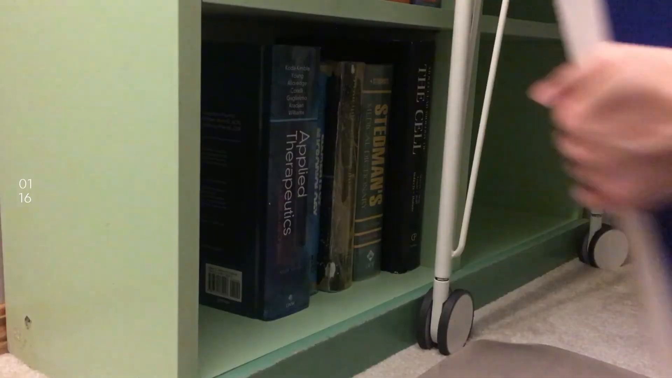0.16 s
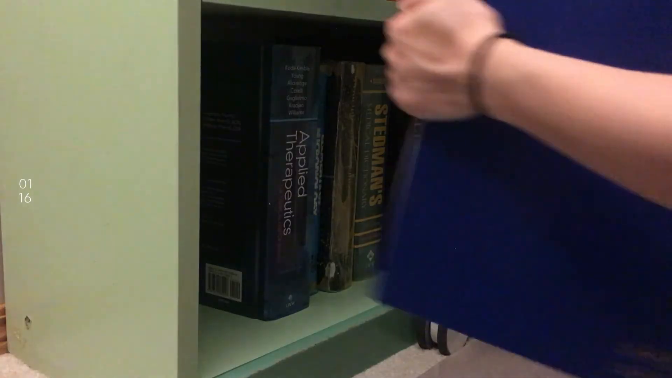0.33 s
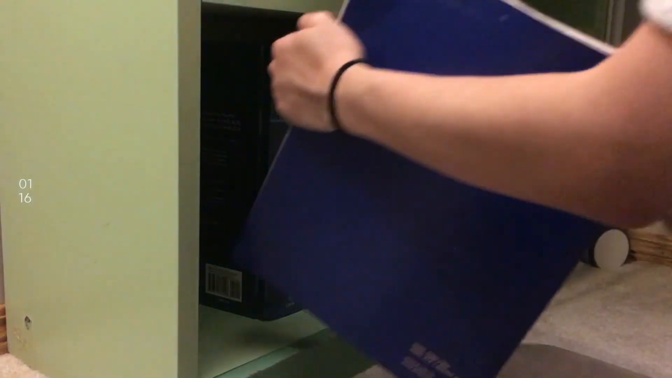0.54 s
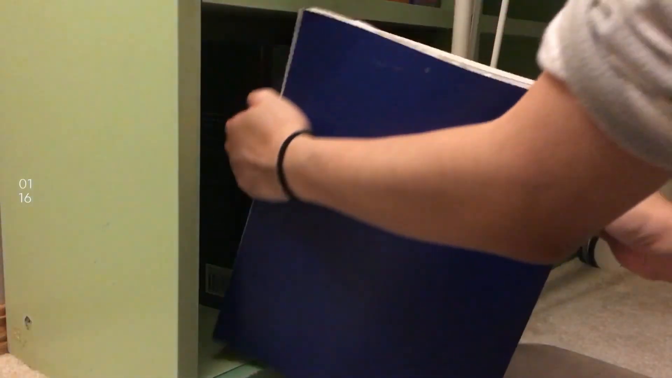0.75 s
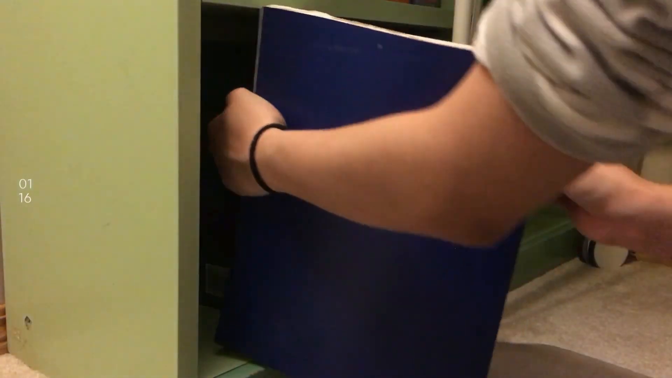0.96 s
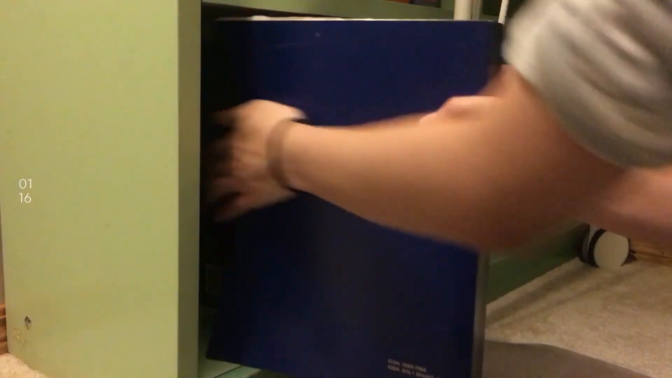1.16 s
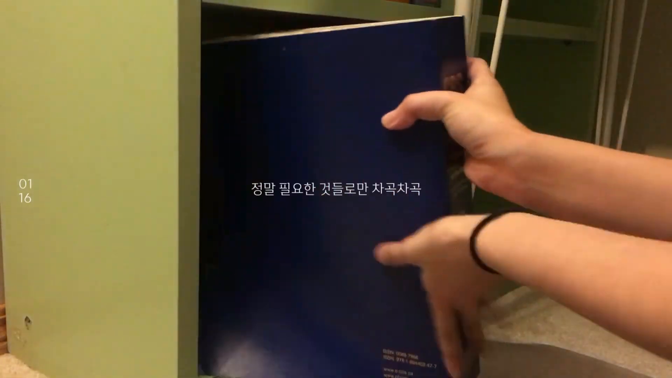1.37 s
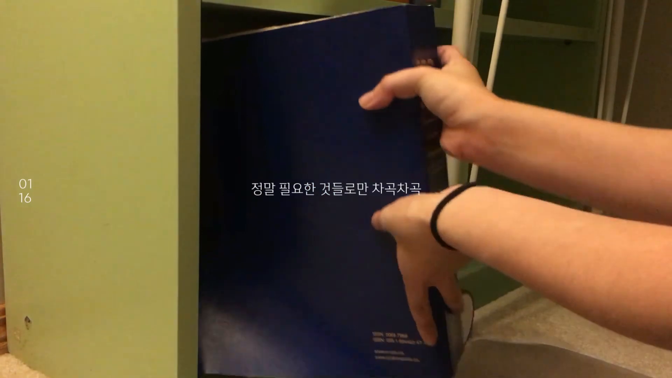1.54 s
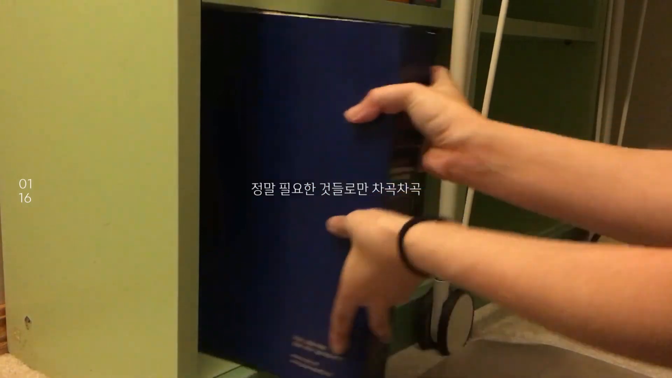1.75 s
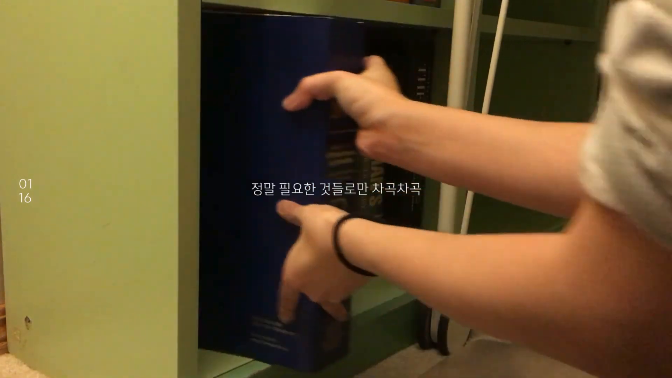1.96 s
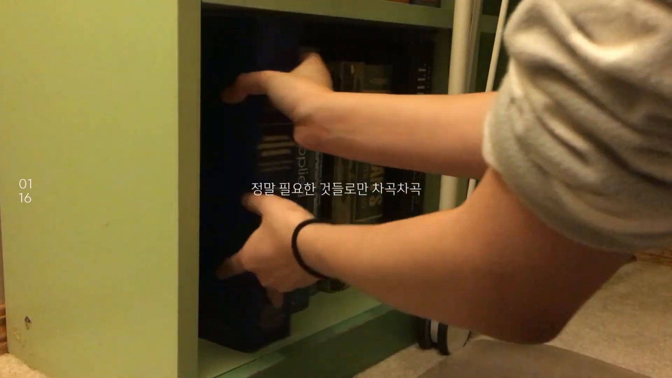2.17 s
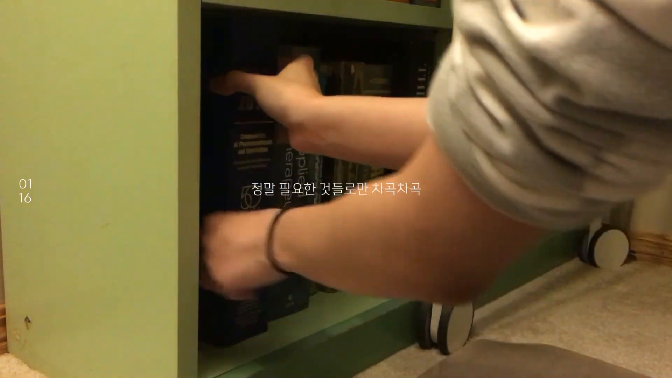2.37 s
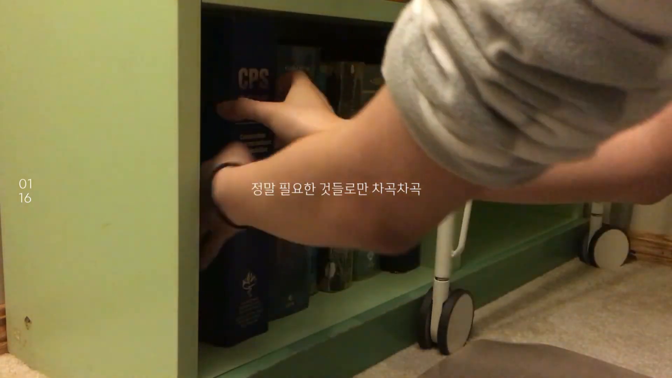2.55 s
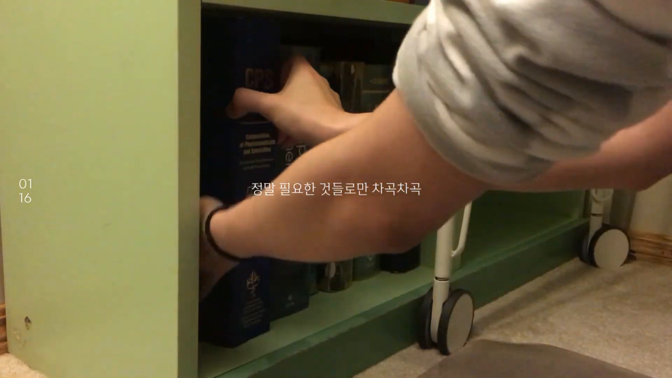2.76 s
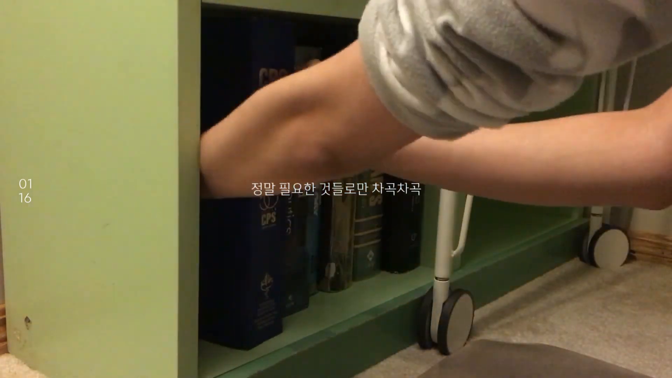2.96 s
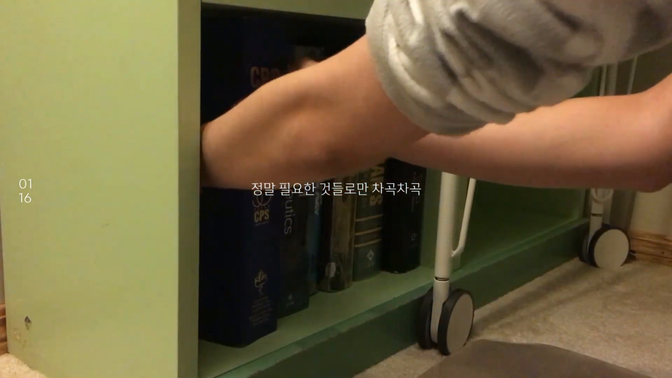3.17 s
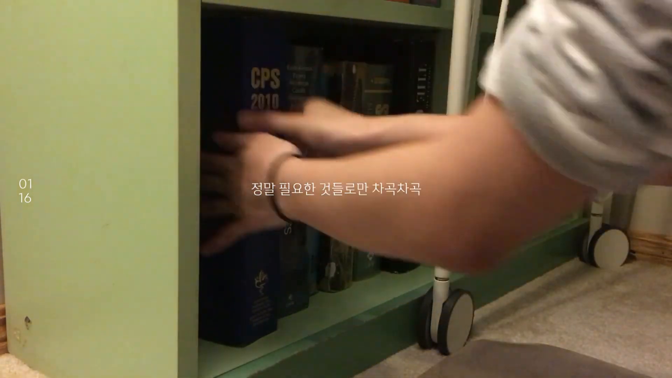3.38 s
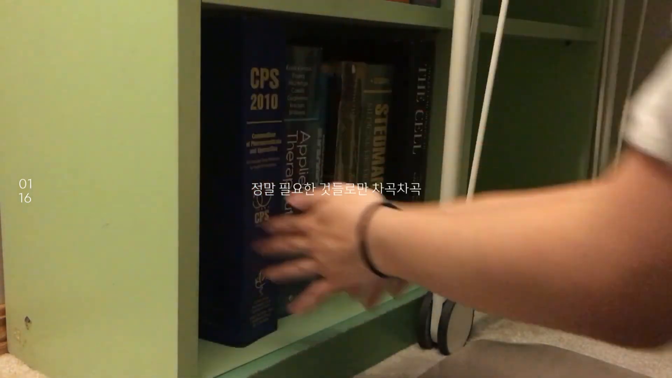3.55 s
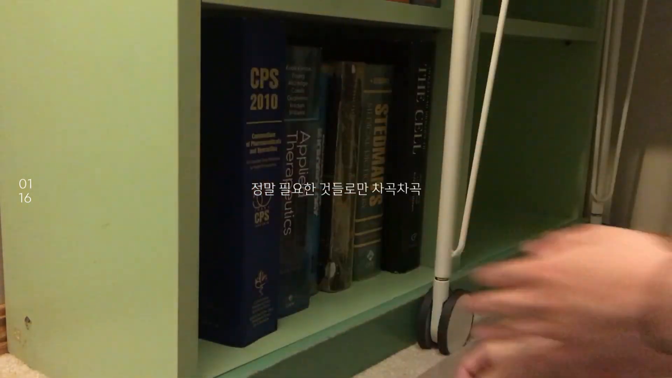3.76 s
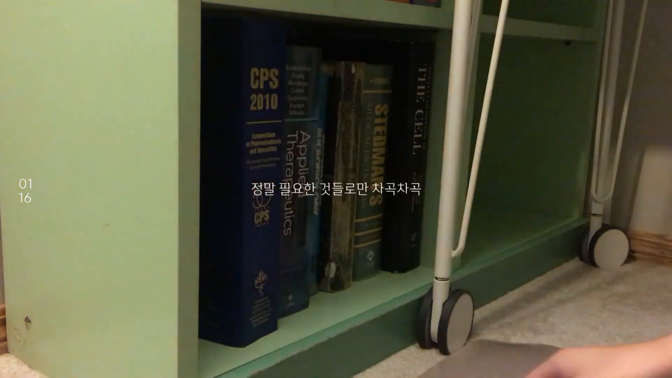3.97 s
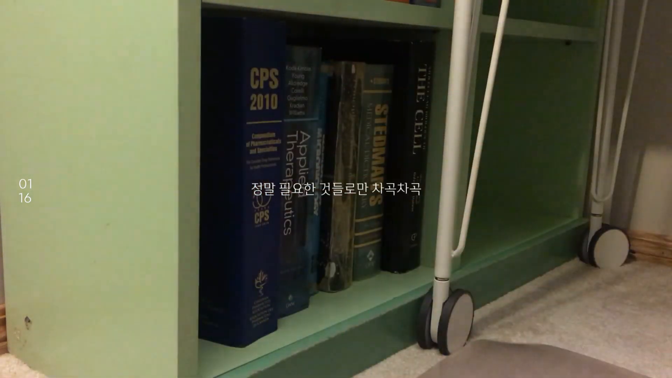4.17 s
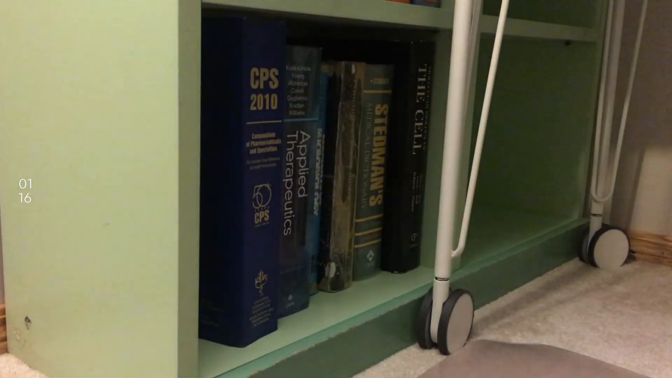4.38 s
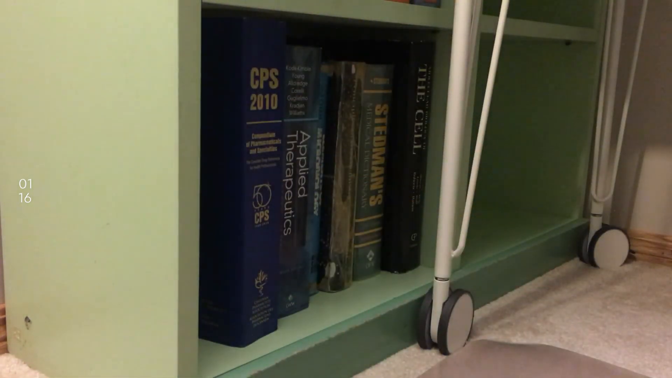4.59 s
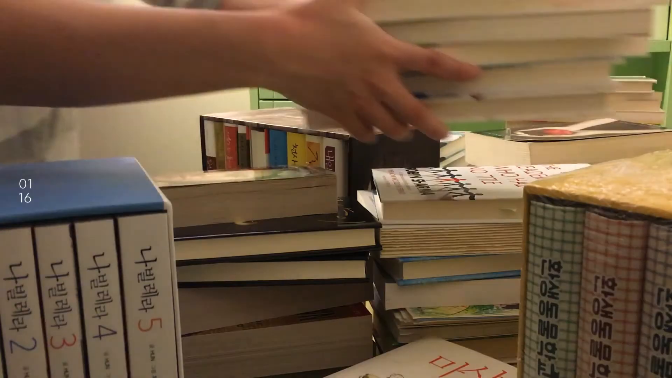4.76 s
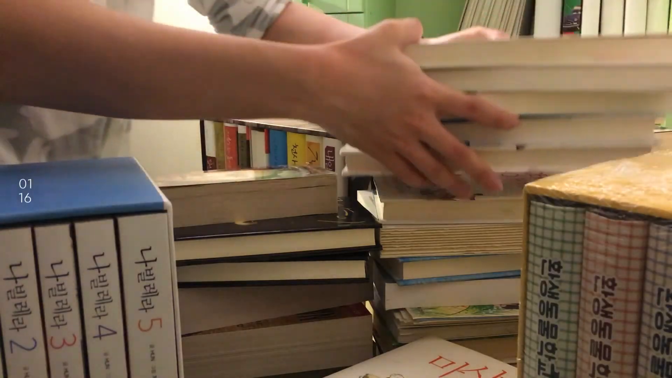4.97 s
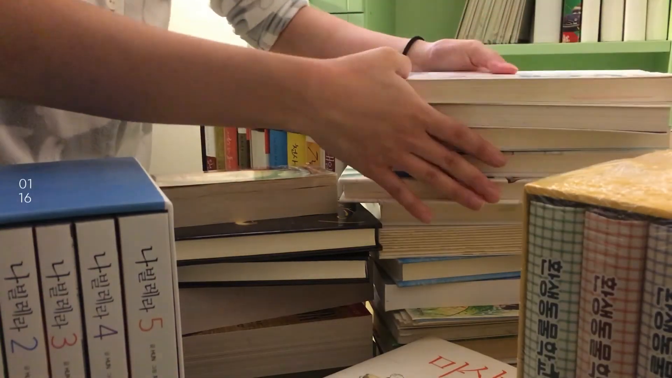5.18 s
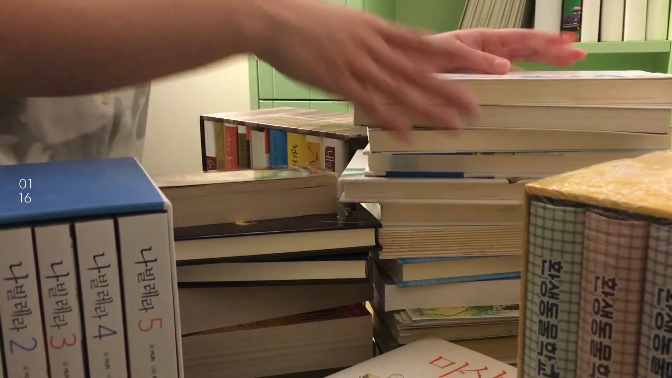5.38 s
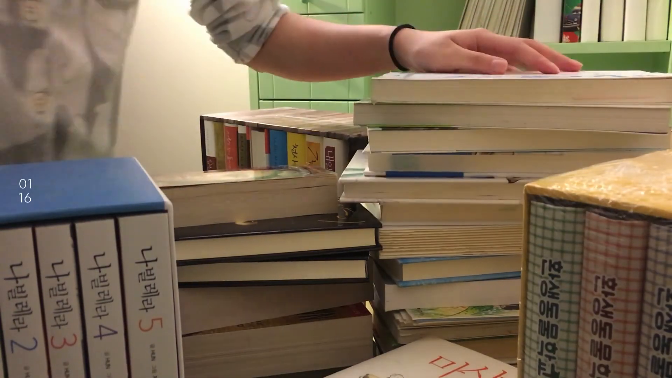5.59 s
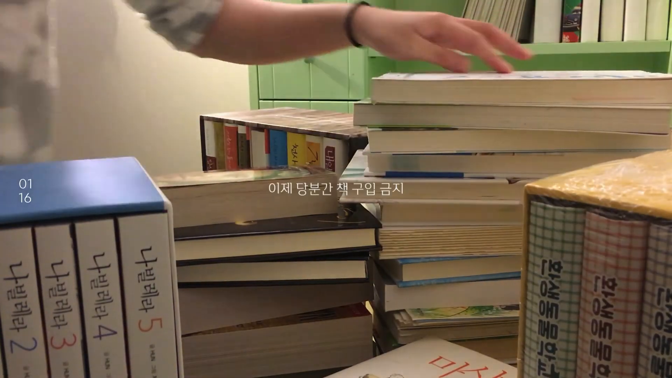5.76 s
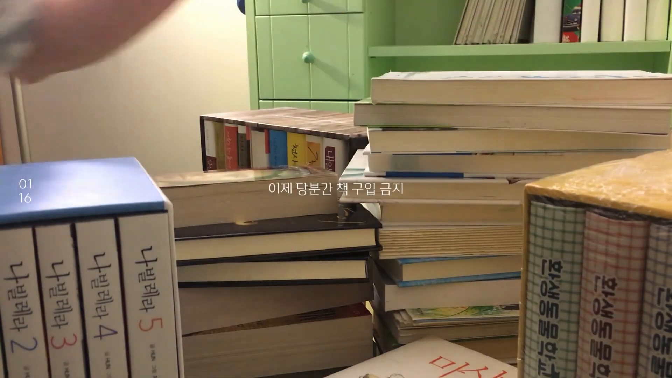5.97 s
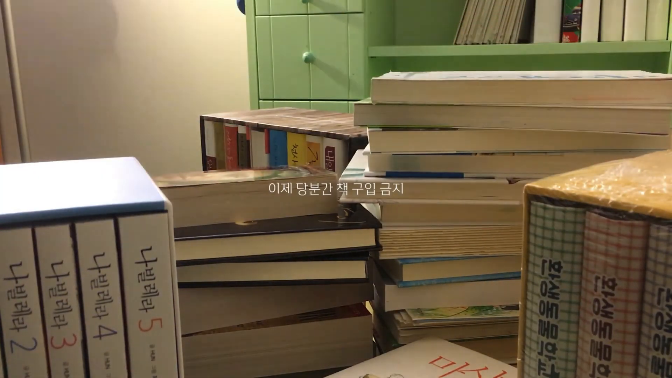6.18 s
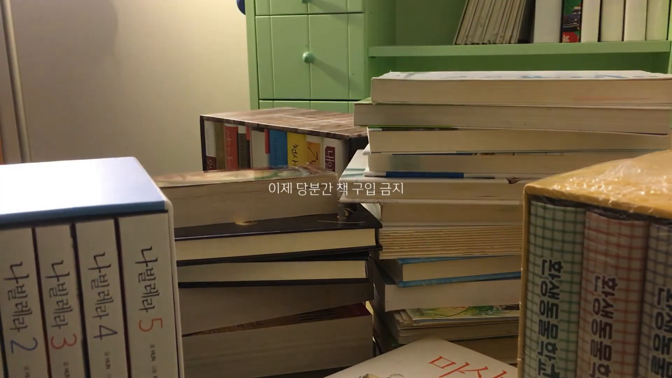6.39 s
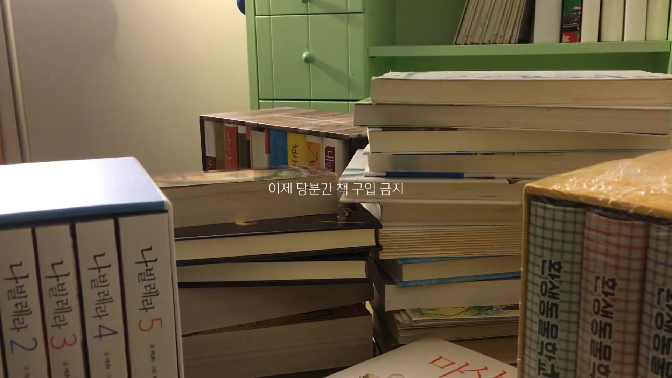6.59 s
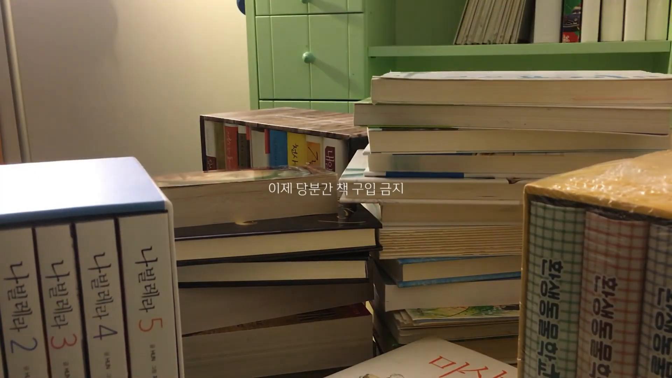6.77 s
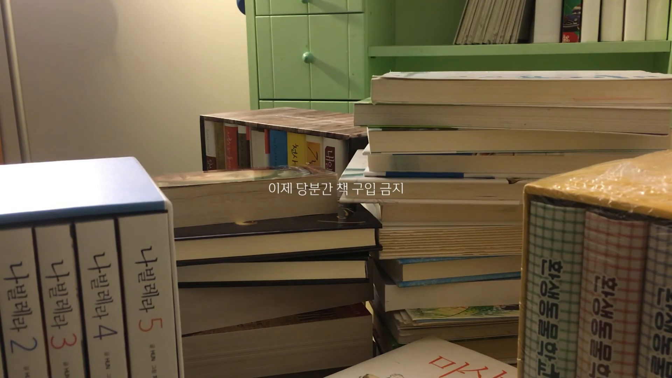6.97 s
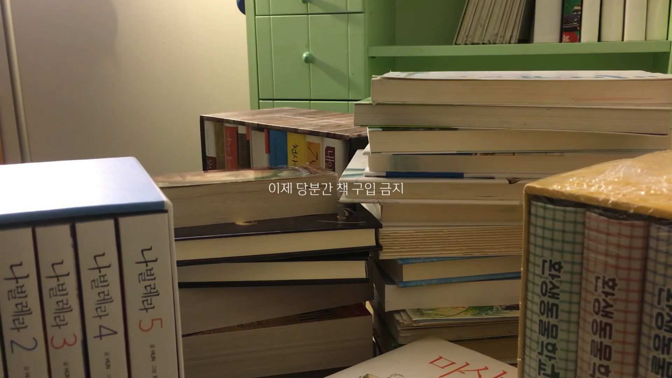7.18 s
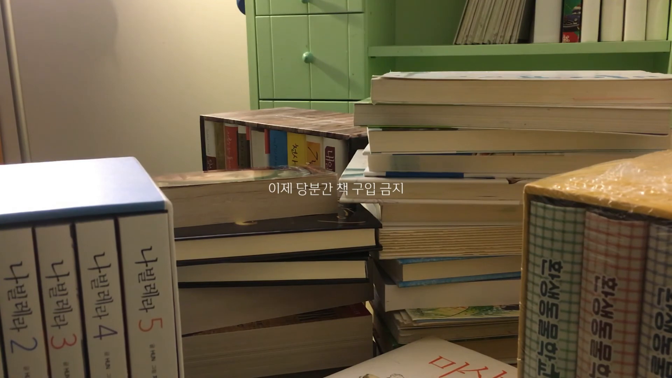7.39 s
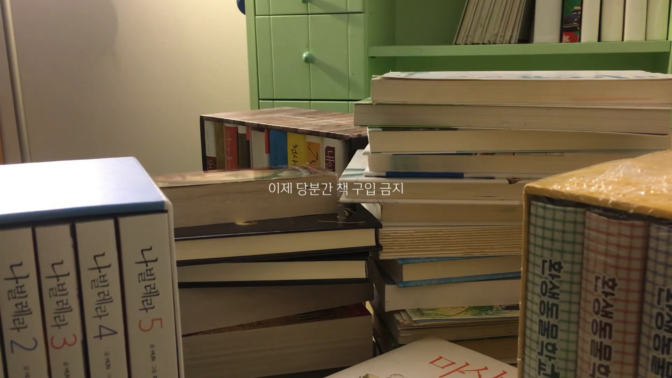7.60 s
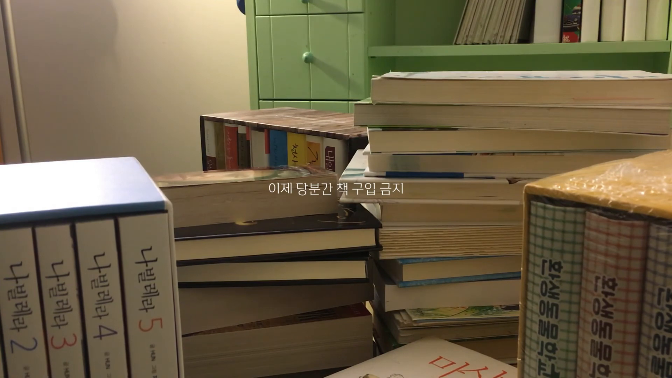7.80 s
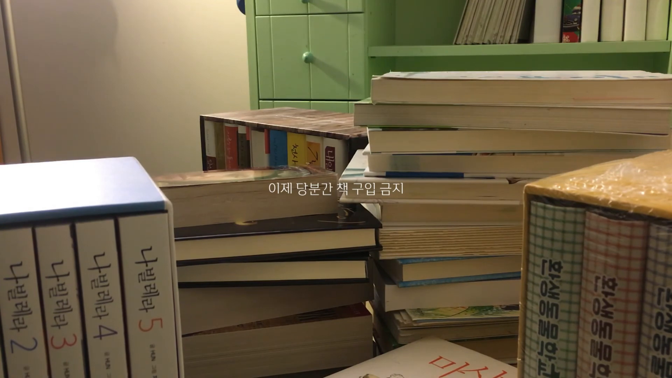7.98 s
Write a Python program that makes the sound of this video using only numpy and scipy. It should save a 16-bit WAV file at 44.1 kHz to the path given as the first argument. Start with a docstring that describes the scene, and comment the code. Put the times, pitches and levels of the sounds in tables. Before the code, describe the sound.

Close, dry indoor handling of books: light bumps, one strong woody knock, then rough sliding of a big cover between neighbours, ending in several firm thuds. Cloth rustles and muffled floor thumps come next. A momentary silence, then paperbacks land heavily on a paper pile, loud and short. The rest is quiet, with small ticks, a few dull bumps and a faint low hum.

```python
"""A quiet room with a wooden shelf: a heavy book is knocked onto it, slid home between its neighbours and
pressed flush; someone shifts on the floor. After a silent gap paperbacks land on a stack.
Contacts are short thuds, clusters of decaying modes and noise slaps; ticks and a squeak are single tones.
Sliding covers, sleeves and rumble are shaped noise under one pressure curve, over steady room tone."""
import sys
import numpy as np
from scipy import signal
from scipy.fft import rfft, irfft, next_fast_len
from scipy.io import wavfile
from scipy.ndimage import uniform_filter1d, map_coordinates

SR = 44100
rng = np.random.default_rng(int(sys.argv[2]) if len(sys.argv) > 2 else 0)


def persist_wave(psi):
    """Save psi, clipped to +-1, as 16-bit WAV."""
    counts = np.round(np.clip(psi, -1, 1) * 32767).astype(np.int16)
    wavfile.write(sys.argv[1], SR, np.atleast_2d(counts).T)


def boost_factor(decibels):
    """Convert a level in decibels to a linear amplitude factor."""
    exponent = np.asarray(decibels, float) / 20
    return 10 ** exponent


N = 354468

# Room tone spectrum: f/Hz, relative level/dB
TONE_SPECTRUM = [(12, -24), (20, 1.5), (63, 4.5), (123, -19), (187, -29.5), (388, -21.5), (542, -6),
                 (802, -16), (1000, -20), (2460, -27.5), (4180, -18), (4810, -33), (9140, -23.5),
                 (14300, -24), (16000, -33.5)]
TONE_RMS_DB = -62
# Steady backdrop, stepping to a new level: from t/s, low hum level/dB, soft rustle level/dB
BACKDROP = [(0, -54, -58.5), (2.4, -57.5, -72.5), (2.729, -61, -59.5), (3.578, -69.5, -67),
            (3.979, -59, -63), (4.77, -54, -64.5)]
# Sleeves and hands brushing past: middle t/s, length/s, level/dB, treble share/dB
STROKES = [(0.335, 0.24, -53.5, -2), (0.72, 1, -61.5, -6), (1.087, 0.3, -55.5, -4),
           (2.894, 0.31, -53.5, -1.5), (3.137, 0.24, -52, -4.5), (3.39, 0.41, -56.5, 0.5),
           (4.24, 0.77, -59, -4.5), (4.354, .1, -50, -7.5), (4.617, 0.38, -57.5, -3),
           (4.931, 0.06, -56, -4), (5.039, 0.11, -53, -2), (5.133, 0.27, -55, -2.5),
           (5.814, 0.33, -63, 1.5), (6.148, 0.26, -65, -3), (6.5, 0.2, -64.5, -1),
           (6.92, 0.32, -61.5, -4.5)]
# Heavy book sliding home: t/s, pressure level/dB, speed as treble share/dB
SLIDE = [(1.145, -47, -6.5), (1.163, -49, -6.5), (1.209, -24, -1), (1.241, -36, -5), (1.415, -30.5, -7),
         (1.421, -32, -4), (1.441, -30, -6.5), (1.515, -43.5, -3), (1.555, -46.5, -5), (1.603, -31.5, 0),
         (1.639, -31, -3), (1.663, -41, -1), (1.725, -41, -1), (1.769, -54, -4), (1.805, -26, -1),
         (1.897, -43.5, 0), (2.015, -44, -2.5), (2.031, -38.5, 1.5), (2.077, -42.5, -1.5),
         (2.315, -35.5, -0.5)]
SLIDE_RELEASE_S, SLIDE_RELEASE_DB = 0.2, -37.5  # the slide dies away against the back wall
USUAL_SHARE_DB = -3
# Short hard scuffs, cover on cover: t/s, level/dB before layer offsets, rise/s, fall/s
SCUFFS = [(1.13, -34.5, 0.0026, 0.0075), (1.183, -42, 0.0051, .02), (1.211, -26.5, 0.0057, 0.0072),
          (1.23, -46, 0.0017, 0.0041), (1.811, -37, 0.015, 0.012), (2.033, -55, .006, .008),
          (1.637, -49.5, .02, 0.018), (5.0715, -23.5, 0.003, 0.002), (6.877, -70, 0.017, 0.019)]
# Spectra of the rubbing layers: f/Hz, relative level/dB
RASP_SPECTRUM = [(260, -48), (450, -9), (688, -9), (830, -0.5), (900, -1.5), (2000, -4.5), (2600, -27),
                 (4400, -120)]
SCRATCH_SPECTRUM = [(1000, -29), (1700, -19), (2170, -6.5), (2320, 1), (2860, 1.5), (4800, -5.5),
                    (6240, -41.5), (10600, -120)]
HISS_SPECTRUM = [(2350, -27), (4000, -5), (4900, -1), (5670, -1), (11600, -6.5), (14900, -13),
                 (16000, -22.5)]
RUMBLE_SPECTRUM = [(15, -37), (25, -2), (70, 1.5), (113, -4.5), (149, 1), (243, -4.5), (369, -7.5),
                   (545, -19), (626, -18), (700, -24), (910, -55.5), (1540, -120)]
RATTLE_SPECTRUM = [(250, -38), (450, -6.5), (800, -2), (1200, -4), (1700, -9.5), (2400, -41.5),
                   (4000, -120)]
RASP_DB, SCRATCH_DB, HISS_DB, RUMBLE_DB = -3.5, -4.5, -3, -10  # layer offsets to the pressure
RUMBLE_DB_PER_DB, SCRATCH_DB_PER_DB = 0.92, 0.038  # rumble slope; extra scratch about -40 dB
SHAKE_DB, SHAKE_T60_S = -30, 0.17  # boards rumble on after each contact
RATTLE_DB, RATTLE_T60_S = -11.5, 0.072  # neighbouring books rasp after an edge knock
# Contacts with the shelf: t/s, contact level/dB, thud f/Hz, edge knock level/dB, flat slap level/dB
# (knock and slap relative to the contact)
KNOCKS = [(0.299, -35.5, 259, 0, -3.5), (0.31, -20, 221, -33, -15.5), (0.357, -22, 271, -13.5, -8),
          (0.4389, -21.5, 234, -21, -26), (0.806, -5.5, 220, -5.5, -18), (0.834, -18, 73, -30.5, -37),
          (0.991, -24.5, 410, -15, -10), (1.049, -31.5, 220, -2, -26), (1.087, -32, 220, -3, -18),
          (1.15, -22, 128, -19, -31), (1.654, -18, 170, -18, -22.5), (1.776, -14, 207, -35.5, -29.5),
          (1.800, -8, 201, -5, -22), (1.803, -2.5, 246.5, -22, -21.5), (1.933, -9.5, 195.4, -8, -34.5),
          (2.0, -32.5, 170.2, -12.5, -36), (2.105, -31.5, 450, -15, -28), (2.142, -23.5, 155, -13, -19),
          (2.307, -20, 195, -16, -29.5), (2.324, -6, 351, -3.5, 0), (2.362, -30.5, 80, -38.5, -36.5),
          (2.455, -10, 310, -5, -42), (2.584, -24, 150, -33, -16), (2.741, -35.5, 273, -21, -13),
          (2.874, -33, 120, -29, -16.5), (2.966, -30.5, 225, -38, -22), (3.187, -21, 166, -14.5, -23),
          (3.227, -32, 80, -39, -36)]
# Soft weight on the floor: columns as KNOCKS
THUMPS = [(3.849, -42.5, 132, -12, -14), (4.102, -28.5, 87, -28, -36), (4.315, -26, 202, -25, -25),
          (4.335, -21, 205, -22, -22), (4.348, -7.5, 205, -19, -21), (4.382, -10, 200, -21, -24),
          (4.418, -40, 188, -28, -35), (4.521, -21.5, 207, -42, -26), (4.534, -16.5, 184, -15, -15),
          (4.721, -33, 120, -8, -24), (5.499, -28.5, 203, -33, -20.5), (6.076, -27.5, 267, -31, -22),
          (6.148, -14, 192, -21.5, -25), (6.184, -24, 185, -24, -35), (6.521, -36, 156, -16, -24.5),
          (6.722, -33, 190, -19, -13.5), (7.431, -35, 164, -18, -27)]
# Paperbacks brush, land on the stack and settle: columns as KNOCKS
LANDING = [(5.005, -40, 237, -22, 0), (5.027, -31.5, 180, -7, -6), (5.07, 4, 184, -12, -17.5),
           (5.092, -2, 177, -16.5, -41), (5.119, -16.5, 150, -20.5, -39)]
# Modes of the shelf boards: f/Hz, relative level/dB, nominal t60/s
SHELF_MODES = [(77.8, -3, 0.43), (149.8, -9, 0.78), (205, -9.5, 0.31), (272.8, -5.5, 0.13),
               (295.4, 0.5, 0.17), (348, -3.5, 0.11), (465, -1, 0.21), (510, -6, 0.14), (628, -2, 0.077),
               (699, -5, 0.18), (792, -0.5, 0.04), (953, -7, 0.057), (1037, -7, 0.16), (1197, -2.5, 0.081),
               (1463, -18, 0.29), (1756, -8, .08), (2110, -20.5, 0.049), (2420, -22.5, .05)]
# Modes of floor and paper stack: f/Hz, relative level/dB, nominal t60/s
STACK_MODES = [(65.4, -3.5, 0.1), (97, -4.5, 0.25), (150, -1.5, 0.22), (175.4, 2, 0.23), (207, -2, 0.039),
               (287, 1.5, 0.068), (409, -3.5, 0.15), (398, 4.5, 0.14), (444, -2.5, 0.035),
               (544, 1.5, 0.066), (700, -12.5, 0.16), (900, -6.5, 0.11), (1091, 11.5, 0.033),
               (1510, -18, 0.058)]
# Drive of the lowest mode, more for a duller, heavier thud: thud f/Hz, level/dB
BOOM = [(85, -4.5), (140, -2.5), (200, -27), (300, -22)]
# Slap spectrum before tilt: f/Hz, relative level/dB
SLAP_SPECTRUM = [(710, -23), (1200, -9), (1720, -14.5), (2110, -9.5), (2830, -19), (3220, -13.5),
                 (6510, -9), (16000, -11)]
EDGE_SOFT_DB, EDGE_HARD_DB, EDGE_SOFT_HZ = -26, 2.5, 550  # a harder edge knocks higher
# Nominal thud t60 for a -23.5 dB contact; stronger contacts last longer (dB of time per dB)
THUD_T60_S, THUD_GROWTH_DB_PER_DB = 0.061, 0.28
THUD_RISE_CYCLES, MODE_SCATTER_DB = 0.35, 2
# Room tail: f/Hz, t60/s
ROOM_T60 = [(100, 0.24), (500, 0.33), (2000, 0.18), (8000, 0.077)]
# Small dry ticks: t/s, ring level/dB, f/Hz, t60/s, click level over ring/dB
TICKS = [(0.807, -15, 1553, .03, -15), (1.129, -40.5, 2520, 0.0044, 5.5), (1.388, -34, 900, 0.008, -2),
         (1.403, -21, 2560, 0.028, -4.5), (1.447, -27, 2050, 0.0082, -7), (2.4545, -19, 978, 0.021, -39),
         (2.599, -54, 1630, 0.02, -5), (2.730, -44, 1274, 0.0089, -6), (3.024, -31, 1720, 0.014, -29),
         (3.399, -49, 1820, 0.096, -9), (4.915, -50, 2550, 0.014, 1), (6.319, -48, 3310, 0.037, -14),
         (6.435, -41, 3760, .03, -26), (6.455, -47, 3570, 0.081, -19), (6.787, -44, 900, .05, -13),
         (6.857, -37, 1060, 0.018, -2.5), (6.948, -50.5, 1940, 0.079, 1)]
# Cover squeaking as it wedges in: t/s, f/Hz, level/dB
SQUEAK = [(1.80, 2980, -51.5), (1.809, 3050, -21), (1.829, 3190, -27.5), (1.848, 3540, -43.5),
          (1.87, 3780, -59.5)]
MIC_LOW_CUT_HZ = 45.4  # the microphone picks up little deep bass from the contacts
# Dips of the microphone housing: centre f/Hz, width/Hz, level/dB
MIC_DIPS = [(4900, 440, -4), (10550, 400, -4)]
# Silences: from t/s, to t/s
GAPS = [(0.134, 0.142), (4.741, 4.770)]


def unit(x):
    """Scales to rms 1."""
    return x / np.sqrt(np.mean(x ** 2) + 1e-20)


def along(points, hz):
    """Interpolates (Hz, value) points on a log frequency axis."""
    f, v = np.transpose(points)
    return np.interp(np.log(hz + 1), np.log(f + 1), v)


def coloured(x, spectrum):
    """Filters x through a (Hz, dB) spectrum, then scales to rms 1."""
    m = next_fast_len(len(x) + 8192)
    gain = boost_factor(along(spectrum, np.fft.rfftfreq(m, 1 / SR)))
    return unit(irfft(rfft(x, m) * gain, m)[:len(x)])


def tilted(spectrum, db_per_octave):
    """Leans the spectrum up or down above 3 kHz."""
    return [(hz, db + db_per_octave * max(np.log2(hz / 3000), 0)) for hz, db in spectrum]


def wobble(knots_per_s):
    """Smooth random curve through normal knots."""
    knots = rng.standard_normal(int(N * knots_per_s / SR) + 4)
    return map_coordinates(knots, [np.arange(N) * knots_per_s / SR])


def add(track, s, sound):
    """Mixes a sound in at time s."""
    part = track[round(s * SR):][:len(sound)]
    part += sound[:len(part)]


def room_tone():
    """Steady quiet hum and hiss: noise through a fixed spectrum."""
    return boost_factor(TONE_RMS_DB) * coloured(rng.standard_normal(N), TONE_SPECTRUM)


def grainy(per_s, spread_db, share):
    """Noise with slip impulses of widely spread size on top."""
    sizes = rng.standard_normal(N) * boost_factor(spread_db * rng.exponential(size=N))
    slips = (rng.random(N) < per_s / SR) * sizes
    return rng.standard_normal(N) + share * unit(slips)


def patchy(x, depth_db):
    """Resonances come and go as the touching area wanders: a smoothed random time-frequency gain."""
    z = signal.stft(x, nperseg=512)[2]
    field = uniform_filter1d(rng.standard_normal(z.shape), size=5, axis=0)
    field = uniform_filter1d(field, size=6, axis=1)
    return unit(signal.istft(z * boost_factor(depth_db * unit(field)), nperseg=512)[1][:N])


def aftermath(times_s, levels_db, t60_s):
    """Envelope that swells at each time and dies away."""
    out, t = np.zeros(N), np.arange(SR // 2) / SR
    for s, db in zip(times_s, levels_db):
        add(out, s, boost_factor(db - 60 * t / t60_s) * (1 - np.exp(-t / 0.011)))
    return out


def pressure(t):
    """Sums slide, backdrop and strokes into one rubbing level (dB) and one speed (dB of treble lean)."""
    end_s, end_db, end_share_db = SLIDE[-1]
    release = (end_s + SLIDE_RELEASE_S, end_db + SLIDE_RELEASE_DB, end_share_db - 7.5)
    s, db, share_db = np.transpose([*SLIDE, release])
    from_s, _, rustle_db = np.transpose(BACKDROP)
    powers = [boost_factor(2 * np.interp(t, s, db, -120, -120)),
              boost_factor(2 * rustle_db[np.searchsorted(from_s[1:], t)])]
    shares_db = [np.interp(t, s, share_db), USUAL_SHARE_DB]
    for middle_s, length_s, stroke_db, stroke_share_db in STROKES:
        swell = np.cos(np.pi * np.clip((t - middle_s) / length_s, -0.5, 0.5)) ** 2
        powers.append(boost_factor(2 * stroke_db) * swell)
        shares_db.append(stroke_share_db)
    total = sum(powers)
    mean_share_db = sum(p * share for p, share in zip(powers, shares_db)) / total
    return 10 * np.log10(total), 1.7 * (mean_share_db - USUAL_SHARE_DB)


def rubbing():
    """Covers slide in gritty slips: faster is brighter; the boards shake under the weight."""
    t = np.arange(N) / SR
    db, speed_db = pressure(t)
    contact_s, contact_db, _, knock_db, _ = np.transpose(KNOCKS + THUMPS + LANDING)
    hum_s, hum_db, _ = np.transpose(BACKDROP)
    grip, judder = wobble(30), wobble(150)  # uneven pressure, shared by rasp, scratch and hiss
    scuff = np.zeros(N)
    for s, scuff_db, rise_s, fall_s in SCUFFS:
        scuff += boost_factor(scuff_db) * np.exp(-((t - s) / np.where(t < s, rise_s, fall_s)) ** 2)

    rasp_db = db + RASP_DB - speed_db + 0.5 * grip + 0.57 * judder
    rasp = boost_factor(rasp_db) + boost_factor(3.5) * scuff
    scratch_db = db + SCRATCH_DB + SCRATCH_DB_PER_DB * (db + 40) - 0.66 * speed_db
    scratch = boost_factor(scratch_db + 0.89 * grip + 0.5 * judder) + boost_factor(-1.5) * scuff
    hiss_db = db + HISS_DB + 0.6 * speed_db + 0.76 * grip + 0.96 * judder
    hiss = boost_factor(hiss_db) + boost_factor(-2) * scuff
    rattle = aftermath(contact_s, contact_db + knock_db + RATTLE_DB, RATTLE_T60_S)

    weight = boost_factor(RUMBLE_DB + RUMBLE_DB_PER_DB * (db - 0.4 * speed_db))
    shake = aftermath(contact_s, contact_db + SHAKE_DB, SHAKE_T60_S)
    hum = boost_factor(hum_db[np.searchsorted(hum_s[1:], t)])
    rumble = (weight + shake + hum) * boost_factor(0.37 * wobble(21))

    grit = patchy(grainy(per_s=1400, spread_db=1, share=0.64), depth_db=1.5)
    fine = grainy(per_s=3100, spread_db=-3, share=0.39)
    out = rattle * coloured(grit, RATTLE_SPECTRUM)
    out += rasp * coloured(grit, RASP_SPECTRUM)
    out += scratch * coloured(grit, SCRATCH_SPECTRUM)
    out += hiss * coloured(fine, HISS_SPECTRUM)
    return out + rumble * coloured(rng.standard_normal(N), RUMBLE_SPECTRUM)


def blows(table, modes, ring_db, focus_db, detune, waver, slap_t60_s, rise_s, dull_db_per_octave,
          damping, thud_share, hard_hz):
    """Each contact thuds for a few cycles, rings the modes near its own pitches hardest and slaps."""
    out, t = np.zeros(N), np.arange(SR // 3) / SR
    hz, mode_db, t60_s = np.repeat(modes, repeats=3, axis=0).T  # loaded boards split modes into clusters
    # neighbouring modes start in opposite directions
    sign = np.repeat((-1.0) ** np.arange(len(modes)), repeats=3)
    for s, db, thud_hz, knock_db, slap_db in table:
        hard = np.clip((knock_db - EDGE_SOFT_DB) / (EDGE_HARD_DB - EDGE_SOFT_DB), 0, 1)
        knock_hz = EDGE_SOFT_HZ * (hard_hz / EDGE_SOFT_HZ) ** hard
        lasts = boost_factor(THUD_GROWTH_DB_PER_DB * (db + 23.5)) * damping

        push = [(80, along(BOOM, thud_hz)), (140, ring_db), (400, ring_db), (560, knock_db),
                (1.3 * knock_hz + 100, knock_db), (3 * knock_hz, knock_db - 13.5)]
        near_thud = np.exp(-(np.log(hz / thud_hz) / 0.42) ** 2)
        near_knock = np.exp(-(np.log(hz / knock_hz) / 0.12) ** 2)
        size_db = db + along(push, hz) + focus_db * (near_thud + near_knock) + mode_db - 13.5
        size = sign * boost_factor(size_db + rng.normal(0, MODE_SCATTER_DB, len(hz)))

        pitch_hz = hz * (1 + detune * np.sqrt(hz / 500) * rng.standard_normal(len(hz)))
        life_s = t60_s * np.where(hz < 90, 1, 0.6 * lasts) * np.exp(0.24 * rng.standard_normal(len(hz)))
        cycles = pitch_hz[:, None] * t
        walk = np.cumsum(rng.standard_normal((len(hz), len(t) // 32 + 1)), axis=1)
        walk = uniform_filter1d(np.repeat(walk, repeats=32, axis=1), size=32, axis=1)[:, :len(t)]
        blur = waver * hz[:, None] / 1000 * walk  # loose books blur the higher modes into noise
        # second term: extra force while in contact
        fade = boost_factor(-60 * t / life_s[:, None]) + boost_factor(3.5 - 60 * cycles / 8)
        start = np.sin(np.pi / 2 * np.clip(cycles / 0.21, 0, 1)) ** 2
        ring = size @ (np.sin(2 * np.pi * cycles + blur) * fade * start)

        thud_fade = boost_factor(db - 3.5 - 60 * t / (THUD_T60_S * lasts * thud_share))
        thud_start = 1 - np.exp(-thud_hz * t / THUD_RISE_CYCLES)
        thud = thud_fade * np.sin(2 * np.pi * thud_hz * t) * thud_start

        crack = coloured(rng.standard_normal(len(t)), tilted(SLAP_SPECTRUM, dull_db_per_octave))
        crack *= boost_factor(-60 * t / slap_t60_s)
        air = coloured(rng.standard_normal(len(t)), tilted(SLAP_SPECTRUM, dull_db_per_octave - 4))
        air *= boost_factor(-9 - 60 * t / 0.12)  # squeezed from the pages
        slap = boost_factor(db + slap_db) * (crack + air)
        add(out, s, (thud + ring + slap) * np.clip(t / rise_s, 0, 1) ** 2)  # an edge lands gradually
    return out


def shelf_knocks():
    """Book on wooden boards: bright modes, lightly damped, with a dull slap."""
    return blows(KNOCKS, SHELF_MODES, ring_db=-12.5, focus_db=6.5, detune=0.04, waver=0.45,
                 slap_t60_s=0.031, rise_s=0.0012, dull_db_per_octave=-13,
                 damping=1.19, thud_share=0.88, hard_hz=1110)


def room_tail(x):
    """A small room's tail: decaying noise, drawn anew for every third of a second."""
    out, step = np.zeros(N), SR // 3
    for start in range(0, N, step):
        hz, t, z = signal.stft(rng.standard_normal(SR // 2), SR, nperseg=256)
        decay = boost_factor(-60 * t / along(ROOM_T60, hz)[:, None])
        tail = signal.istft(z * decay, SR, nperseg=256)[1]
        wet = signal.fftconvolve(x[start:start + step], tail / np.linalg.norm(tail))
        add(out, start / SR + 0.004, wet)
    return out


def ticks():
    """A click that rings briefly at one pitch, with a wavering phase."""
    out, t = np.zeros(N), np.arange(SR // 8) / SR
    for s, db, hz, t60_s, click_db in TICKS:
        waver = np.cumsum(rng.standard_normal(len(t))) * 0.08
        ring = boost_factor(-60 * t / t60_s) * np.sin(2 * np.pi * hz * t + waver)
        click = coloured(rng.standard_normal(len(t)), tilted(SLAP_SPECTRUM, -3.3))
        click *= boost_factor(click_db - 60 * t / 0.021) * (1 - np.exp(-t / 0.00062))
        add(out, s, boost_factor(db) * (ring + click))
    return out


def squeak():
    """A rough tone that climbs as the cover tightens: a sine with jittered pitch."""
    s, hz, db = np.transpose(SQUEAK)
    t = np.arange(N) / SR
    pitch_hz = np.interp(t, s, hz) * (1 + 0.037 * wobble(600))
    phase = 2 * np.pi * np.cumsum(pitch_hz) / SR
    return boost_factor(np.interp(t, s, db, -120, -120)) * np.sin(phase)


def floor_thumps():
    """Soft weight on the floor: low modes, weakly driven, with a gradual onset."""
    return blows(THUMPS, STACK_MODES, ring_db=-18.5, focus_db=7, detune=0.033, waver=0.57,
                 slap_t60_s=0.017, rise_s=0.003, dull_db_per_octave=-5,
                 damping=0.76, thud_share=0.94, hard_hz=1110)


def paperback_landing():
    """Paperbacks on a stack: the same modes cut short, with a brief thud."""
    return blows(LANDING, STACK_MODES, ring_db=-15.5, focus_db=4.5, detune=0.038, waver=0.57,
                 slap_t60_s=0.013, rise_s=0.0029, dull_db_per_octave=-5,
                 damping=0.47, thud_share=0.44, hard_hz=557)


def scene():
    """Near contacts with their room tail, over rubbing and room tone."""
    hits = shelf_knocks() + ticks() + squeak() + floor_thumps() + paperback_landing()
    low_cut = signal.butter(2, MIC_LOW_CUT_HZ, "high", fs=SR, output="sos")
    hits = signal.sosfilt(low_cut, hits)
    return (hits + boost_factor(-12.5) * room_tail(hits) + rubbing() + room_tone())[None]


def band_limit(x):
    """A steep low-pass at the top of the band."""
    return signal.sosfilt(signal.butter(12, 15850, fs=SR, output="sos"), x)


def record(dry):
    """The housing dips the treble; two short stretches are silent; loud peaks round off."""
    t, hz = np.arange(N) / SR, np.fft.rfftfreq(N, 1 / SR)
    dips_db = sum(db * np.exp(-((hz - centre_hz) / width_hz) ** 2) for centre_hz, width_hz, db in MIC_DIPS)
    x = irfft(rfft(dry) * boost_factor(dips_db), N)
    for from_s, to_s in GAPS:
        x = x * np.clip(np.maximum((from_s - t) / 0.0039, (t - to_s) / 0.0065), 0, 1)  # fade out, fade in
    x = x / (1 + np.abs(x / 0.95) ** 4) ** (1 / 4)
    return band_limit(x)


dry = scene()
out = record(dry)
persist_wave(out)
```